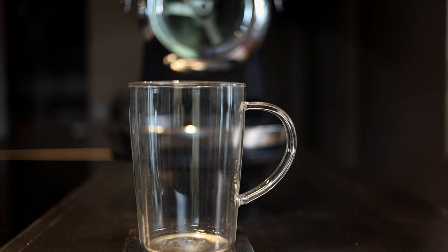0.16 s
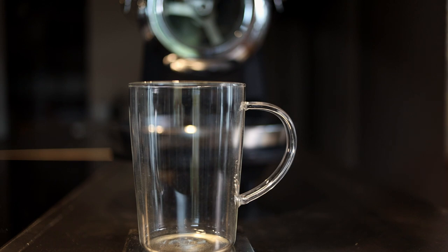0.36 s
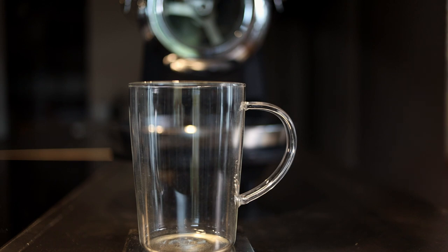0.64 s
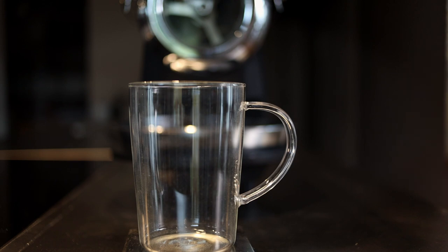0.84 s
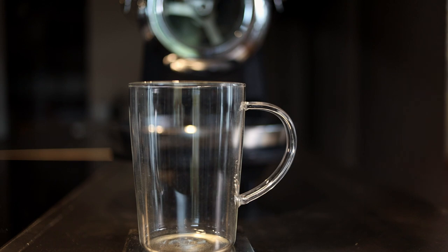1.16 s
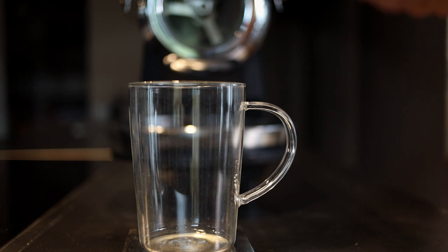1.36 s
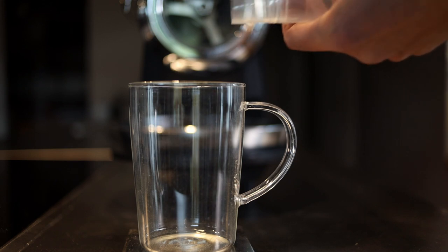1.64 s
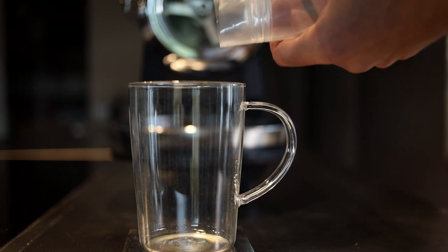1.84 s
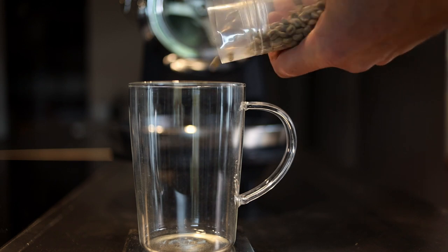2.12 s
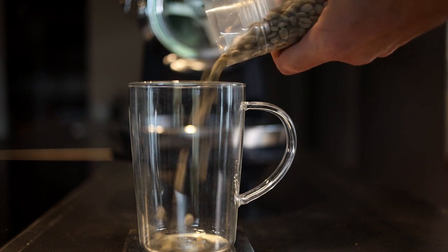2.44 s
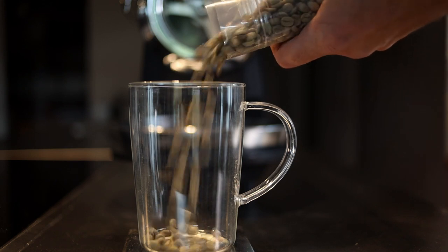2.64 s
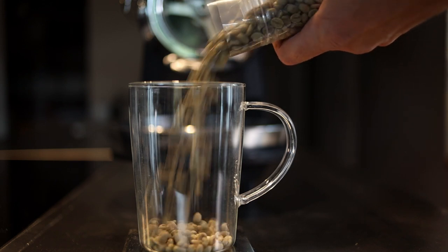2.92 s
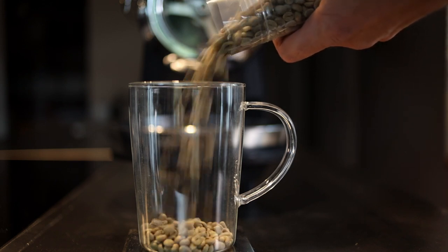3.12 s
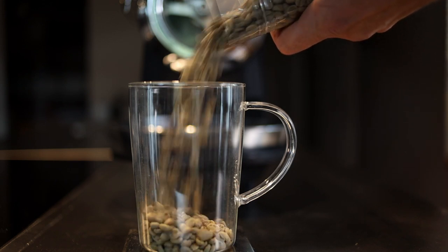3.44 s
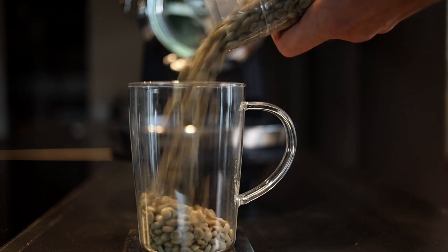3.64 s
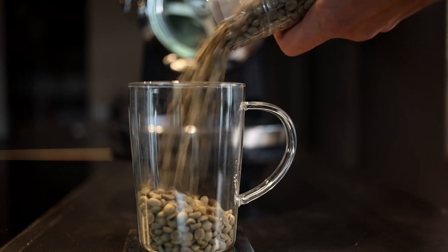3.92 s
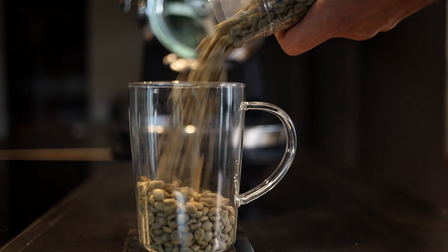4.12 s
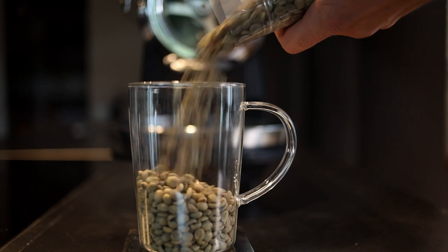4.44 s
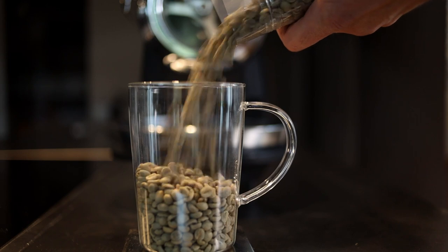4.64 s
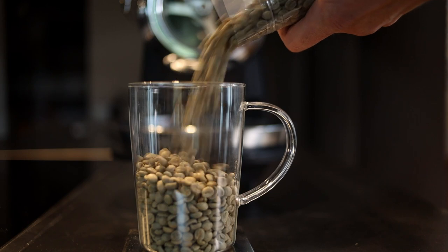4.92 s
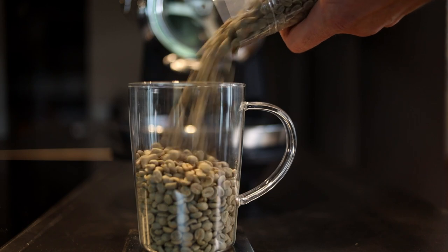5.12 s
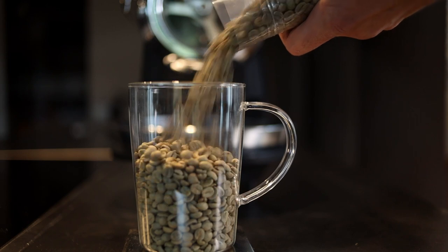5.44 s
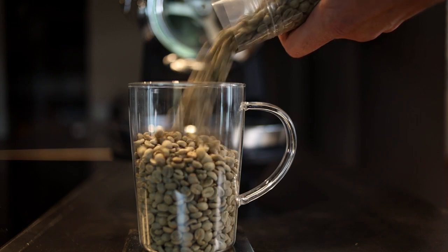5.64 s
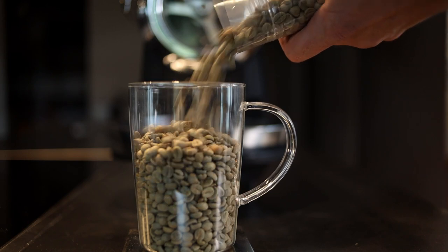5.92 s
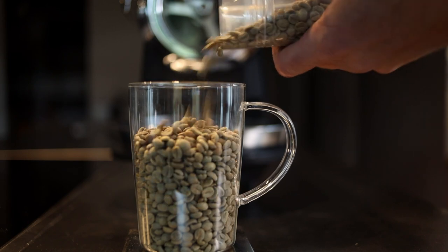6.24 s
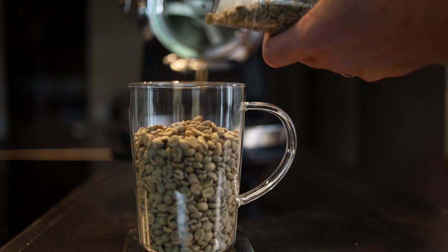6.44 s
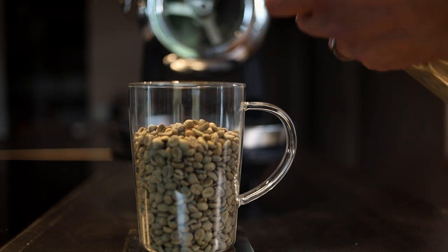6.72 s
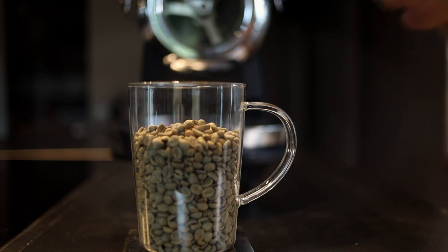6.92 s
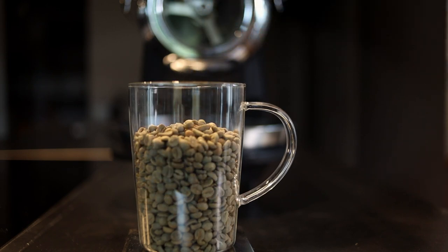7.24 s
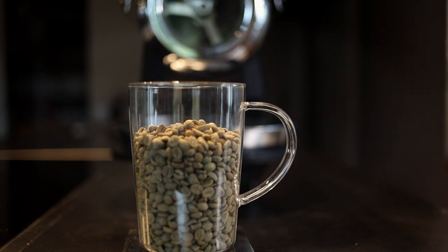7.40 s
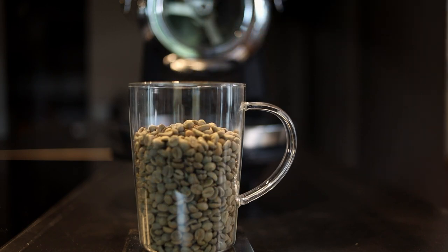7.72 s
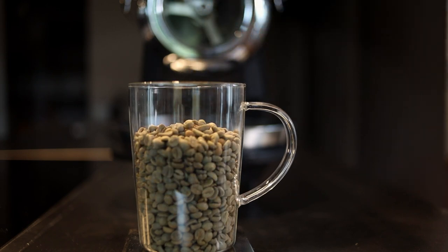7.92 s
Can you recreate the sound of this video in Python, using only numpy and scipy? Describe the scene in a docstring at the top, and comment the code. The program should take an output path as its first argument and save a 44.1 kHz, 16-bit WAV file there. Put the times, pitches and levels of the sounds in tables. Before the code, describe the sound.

Thin plastic pops and clicks while hard beans jostle within it, with soft low handling bumps. A stream of beans strikes an empty glass mug sharply, ringing and sizzling, then quickly drops to a softer, steady patter with faint rim tinkles. After the last few beans, the remaining ones tumble back in the cup, rattling brightly with hollow knocks. Close microphone, small room with short reverberation, faint steady room tone.

```python
"""Hard beans slide and rattle in a thin plastic cup that creaks and snaps in a hand, then pour into a glass mug.
The first beans ring the bare bottom; later ones ring the wall and patter on the heap, until only the rim rings.
The stream thins to single beans, the cup is tipped back and its beans slide down again with a brighter hiss.
Noise bursts make the rattle, hiss and patter, damped sines the knocks and snaps, resonant modes the glass.
A small room answers the hand and the mug over a steady room tone."""
import sys
import numpy as np
from scipy import signal
from scipy.fft import rfft, irfft, next_fast_len
from scipy.io import wavfile
from scipy.ndimage import map_coordinates

SR = 44100
rng = np.random.default_rng(int(sys.argv[2]) if len(sys.argv) > 2 else 0)


def output_pcm(signal):
    """Save a mono or channel-first signal as 16-bit PCM at the path in sys.argv[1].

    Samples are clipped to [-1, 1] before scaling.
    """
    pcm = np.clip(np.atleast_2d(signal).T, -1, 1) * 32767
    wavfile.write(sys.argv[1], SR, np.round(pcm).astype(np.int16))


N = 355887
TIME = np.arange(N) / SR  # s

# the stream of beans onto the glass: [t/s, clatter level/dB]
POUR = [(2.34, -45), (2.46, -32.5), (2.55, -25), (2.72, -24), (2.9, -21), (3.13, -24), (3.24, -35.5),
        (3.32, -35), (3.58, -40), (3.66, -40), (3.82, -41), (3.9, -44.5), (4.25, -39.5), (4.45, -46),
        (5.4, -49), (6.1, -55), (6.39, -53), (6.62, -63.5)]


def cup():
    """Sliding beans: dull noise bursts and hollow knocks on the plastic, and a finer hiss of bean on bean."""
    # spectrum of the dull rattle: [f/Hz, level/dB]
    rattle_spectrum = [(30, -32), (210, -14), (247, -9), (357, -3.5), (621, 2.5), (1250, 1.5), (4000, -24),
                       (5200, -50), (8800, -120)]
    # spectrum of the bean-on-bean hiss: [f/Hz, level/dB]
    hiss_spectrum = [(1290, -10), (2200, 1), (6120, -13), (8030, -16.5), (15800, -31)]
    # hiss of the beans running back down the emptied cup: [f/Hz, level/dB]
    tumble_spectrum = [(1180, -28), (2000, -2), (3540, -5.5), (6160, -8.5), (7070, -11), (7980, -22),
                       (9650, -21.5), (15800, -37.5)]
    # span with the cup tipped back: [from t/s, to t/s]
    tipped_back = (6.5, 7.45)
    # a tilt lets the beans slide: [start t/s, rise/s, hold/s, rattle level/dB, fall/(dB/s), hiss re rattle/dB]
    slides = [(0.545, 0.0063, 0.031, -25.5, 71, -11.5), (1.03, 0.072, 0.074, -39, 100, -6),
              (1.16, 0.11, 0.0034, -28.5, 83, -9), (1.45, 0.38, 0.17, -47, 60, -12),
              (1.75, 0.31, .005, -43, 32, -5), (2.06, 0.12, .02, -43, 100, -27),
              (6.605, 0.036, 0.0053, -48.5, 56, -4.5), (6.64, 0.1, 0.063, -35.5, 22, -6.5),
              (6.75, 0.21, 0.27, -28.5, 82, -13), (7.53, 0.11, .005, -42, 79, 0),
              (7.8, 0.28, 0.17, -62, 30, -26)]
    # a jerk of the cup shakes the beans: [start t/s, rattle level/dB, fall/(dB/s), hiss re rattle/dB]
    jolts = [(-0.015, -33, 94, -2), (0.188, -37, 167, -32), (0.275, -39, 121, -3.5), (0.469, -37.5, 60, -9),
             (0.837, -34, 205, -38), (0.9, -43, 32.5, -7), (0.991, -26.5, 198, -5.5),
             (1.451, -35.5, 236, -17), (2.199, -34, 138, -8), (7.515, -33, 201, -26),
             (7.603, -35, 87.5, -7), (7.698, -29, 114.5, -3.5)]
    jolt_rise_s = 0.0095
    hiss_fall = 1.14  # the hiss dies this many times faster than the rattle

    rumble = unit(coloured(contacts(700, spread_db=3.0, life=0.004), rattle_spectrum))
    hollow = unit(knocks(count=1800, pitch_hz=998, cycles=10.8, spread_db=0.0, size=3))
    rattle = unit((rumble + 0.69 * hollow) * clumps(0.3, 25))

    grit = contacts(7900, spread_db=2.0, life=0.0007)
    is_back = np.abs(TIME - np.mean(tipped_back)) < np.ptp(tipped_back) / 2
    hiss = np.where(is_back, unit(coloured(grit, tumble_spectrum)), unit(coloured(grit, hiss_spectrum)))

    # overlapping movements add as power
    rattle_power, hiss_power = np.zeros(N), np.zeros(N)
    moves = [*slides, *((s, jolt_rise_s, 0, db, fall, hiss_db) for s, db, fall, hiss_db in jolts)]
    for start, rise, hold, db, fall, hiss_db in moves:
        rattle_power += amp(2 * db) * swell(start, rise, hold, fall)
        hiss_power += amp(2 * (db + hiss_db)) * swell(start, rise, hold, hiss_fall * fall)
    return np.sqrt(rattle_power) * rattle + np.sqrt(hiss_power) * hiss


def clunks():
    """Lumps of beans hit the cup wall: each is a sine that dies within a few cycles."""
    # the lumps: [t/s, level/dB, f/Hz]
    lumps = [(.712, -26.5, 420), (6.914, -21, 550), (6.984, -13, 710), (7.125, -20, 546), (7.198, -19, 770),
             (7.246, -25, 694)]
    return blips(lumps, cycles=3.3)


def snaps():
    """A snap is a few cycles of the bent panel, a dull burst and a very short crack; the thin cup radiates no bass."""
    # the cup wall buckles or knocks: [t/s, panel level/dB, panel f/Hz, crack re panel/dB]
    buckles = [(0.0808, -10.5, 1930, -50), (0.1995, -17, 790, -52), (0.2008, -10.5, 2350, -50),
               (0.2794, -9.5, 2300, -38), (0.3032, -17.5, 920, -35), (0.487, -19, 1260, -23),
               (0.526, -7, 1440, -18), (0.5575, -16.5, 363, -4.5), (0.5816, -12, 1270, -7),
               (0.5987, -6, 705, -17), (0.64, -18, 660, -35), (0.753, -22.5, 447, -30),
               (0.8388, -19.5, 710, -39), (0.8777, -19, 526, -14.5), (1.001, -26.5, 920, -5),
               (1.1623, -11.5, 1950, -15), (1.2167, -17, 515, -21), (1.249, -11, 625, -7.5),
               (1.286, -12, 1080, -21), (1.4373, -18.5, 935, -47), (1.4667, -19.5, 610, -33.5),
               (1.777, -25.5, 1170, -18), (2.0338, -17.5, 1660, -15), (2.2143, -12.5, 1900, -23),
               (2.432, -14.5, 682, -4.5), (6.651, -7, 1380, -31), (7.2958, -11, 728, -35),
               (7.5239, -22, 533, -33), (7.5397, -15.5, 686, -23.5), (7.6082, -3, 1170, -20),
               (7.7095, -9, 1780, -17), (7.7123, -8.5, 1815, -9.5), (7.9778, -38, 492, -30.5),
               (8.0146, -38.5, 1008, -46)]
    out, t = np.zeros(N + SR), np.arange(SR // 25) / SR
    burst_decay = amp(-60 * t / 0.011)  # 60 dB down in 11 ms
    for s, db, hz, crack_db in buckles:
        attack = 1 - np.exp(-t / 0.000065)
        panel = np.sin(2 * np.pi * hz * t) * np.exp(-hz * t / 1.35) * attack
        # the wider smoothing window makes the duller burst
        thud = np.convolve(rng.standard_normal(len(t)), np.hanning(14) / 3)[:len(t)] * burst_decay
        crack = np.convolve(rng.standard_normal(len(t)), np.hanning(5) / 2)[:len(t)] * burst_decay
        out[round(s * SR):][:len(t)] += amp(db) * (panel + 0.4 * thud + amp(crack_db) * crack)
    thin_cup = signal.butter(2, [330, 9000], "band", fs=SR, output="sos")
    return signal.sosfilt(thin_cup, out[:N])


def thumps():
    """Low bumps of hand and cup: heavily damped sines of about one cycle."""
    # the bumps: [t/s, level/dB, f/Hz]
    bumps = [(0.905, -32, 150), (1.605, -45, 69.6), (1.775, -41, 174), (1.985, -37, 163), (2.21, -23, 174),
             (7.3, -25, 117), (7.708, -21.5, 150)]
    return blips(bumps, cycles=0.91)


def mug():
    """The stream rings the bottom while it is bare, then the wall, then only the rim; the heap patters."""
    # the heap hides the bottom: [from t/s, to t/s]
    covered = (3.22, 3.3)
    # the heap climbs the wall: [from t/s, to t/s]
    filled = (3.8, 4.55)
    # the stream dwindles to single beans: [from t/s, to t/s]
    thinning = (6.1, 6.35)
    # each falls from 1 to 0 over its span
    bare, low, dense = (np.interp(TIME, span, [1, 0]) for span in (covered, filled, thinning))
    stream, sides = pouring_beans(low, dense)
    return glass(stream, sides, bare, low, dense) + amp(-8 * bare) * clicks(stream, dense) + heap()


def pouring_beans(low, dense):
    """Impulses of random size for beans on the glass, and those of them that glance off its sides."""
    # single clear beans on the glass: [t/s, blow level/dB]
    strikes = [(2.335, 5), (2.4156, 5), (2.4407, 4.5), (2.4564, -2), (2.4701, 7), (2.4764, 2),
               (2.5004, 7.5), (2.5159, 1.5), (2.5251, 6), (2.549, 6), (2.5875, 6), (2.6004, 6),
               (2.616, 8.5), (2.6497, 6.5), (2.6668, 6.5), (2.7165, 4), (2.742, 5), (2.7518, 6.5),
               (2.836, 7.5), (2.8917, 5), (2.9366, 0.5), (3.4227, 1), (3.6501, 1.5), (6.0646, -20),
               (6.109, -12), (6.2841, -14), (6.4607, -22), (6.543, -28)]
    glance_db = -11.5  # share of a clear blow that the sides take
    rate = 150 + 200 * dense  # beans a second
    sizes = amp(0.8 * np.minimum(rng.exponential(size=N), 3.5))
    stream = sizes * (rng.random(N) < rate / SR) * clumps(0.47, 18) / np.sqrt(rate)
    stream *= amp(curve(POUR)) / np.sqrt(np.mean(stream ** 2))
    sides = stream * (rng.random(N) < .4 + .3 * low)
    for s, db in strikes:
        stream[round(s * SR)] = amp(db)
        sides[round(s * SR)] = amp(db + glance_db)
    return stream, sides


def glass(stream, sides, bare, low, dense):
    """Blows excite the modes of base, free wall and rim in turn; nothing of the ring sounds below about 400 Hz."""
    # air column and thick base: [f/Hz, width/Hz, level/dB]
    bottom_modes = [(643, 90, -20.5), (1796, 150, -14.5), (3270, 700, -2), (6290, 1110, 0),
                    (8000, 1400, -11), (9650, 920, -4.5), (10800, 1700, -9.5), (14340, 2700, -4.5)]
    # free wall: [f/Hz, width/Hz, level/dB]
    wall_modes = [(3500, 45, -10), (3910, 28, 0), (4260, 34, -1), (5020, 120, -10), (5460, 28, -2),
                  (6210, 35, -11), (6460, 45, -6), (7470, 62, 0), (7960, 47, -2), (8310, 40, -9),
                  (8590, 54, -10), (12600, 62, -9), (14300, 90, -11)]
    # what still rings above the heap: [f/Hz, width/Hz, level/dB]
    rim_modes = [(4690, 41, -4), (5490, 60, -3), (6610, 120, -0.5), (7860, 124, 0.5), (8570, 86, 0),
                 (10700, 80, -16), (11680, 200, 0.5)]
    bottom_db, wall_db, rim_db = 5.5, 22.5, 8.5  # gains of the three rings
    wall_bare_db = -14  # the wall is seldom hit while beans reach the bottom

    # on bare glass a bean hops and lands again
    bounced = stream.copy()
    at = np.flatnonzero(stream[:-SR // 10])
    hop = (SR * rng.uniform(.0012, .0045, len(at))).astype(int)
    bounced[at + hop] += 0.65 * stream[at]

    bottom = ringing(bounced * bare, bottom_modes, scatter_db=3.0, order=2, wander=.012, climb=0)
    wall_blows = sides * amp(wall_bare_db * bare) * low
    wall = ringing(wall_blows, wall_modes, scatter_db=4.0, order=1, wander=.0012, climb=0)
    rim = ringing(sides * (1 - low), rim_modes, scatter_db=5.0, order=1, wander=0.0054, climb=.012)
    rim *= amp(-4 * (1 - dense))  # the last beans drop softly
    ring = amp(bottom_db) * bottom + amp(wall_db) * wall + amp(rim_db) * rim
    return signal.sosfilt(signal.butter(2, 400, "high", fs=SR, output="sos"), ring)


def clicks(stream, dense):
    """Every bean of the stream ticks in a short bright burst; many finer contacts of bean on bean sizzle."""
    # spectrum of a hard contact: [f/Hz, level/dB]
    tick_spectrum = [(1180, -35.5), (2000, -19), (3960, -3), (10800, -3), (15800, -6)]
    ticks = amp(-9.0) * coloured(bursts(stream, life=0.0035), tick_spectrum)
    fine = unit(coloured(contacts(4000, spread_db=2.0, life=.0005), tick_spectrum))
    return ticks + dense * amp(curve(POUR) - 3.0) * fine


def heap():
    """Beans patter on beans: dull bursts and hollow knocks, bunched at two speeds."""
    # the stream on the heap: [t/s, patter level/dB]
    patter_level = [(2.33, -51), (2.46, -44), (2.55, -52), (2.9, -55), (3.6, -46.5), (4.7, -47.5),
                    (5.4, -47.5), (5.5, -47), (5.7, -50), (5.85, -46.5), (6.1, -53.5), (6.39, -70),
                    (6.62, -72)]
    # spectrum of the dull bursts: [f/Hz, level/dB]
    patter_spectrum = [(30, -34.5), (173, -18), (424, -2), (851, -0.5), (1040, 1), (2170, -3.5),
                       (2870, -11), (4550, -44.5), (7700, -120)]
    dull = unit(coloured(contacts(900, spread_db=0.0, life=0.0024), patter_spectrum))
    hollow = unit(knocks(count=2000, pitch_hz=1397, cycles=25.0, spread_db=1.5, size=4))
    patter = unit((dull + 0.59 * hollow) * clumps(0.99, 22) * clumps(1.17, 6.5))
    return amp(curve(patter_level)) * patter


def settling():
    """Beans knock as the heap settles: soft sines that die within several cycles."""
    # the knocks: [t/s, level/dB, f/Hz]
    shifts = [(4.407, -37, 1025), (4.44, -34, 1060), (5.049, -34, 960), (5.249, -34, 1220),
              (5.501, -35, 1044), (5.588, -37, 1160), (5.759, -37, 1060), (5.779, -33, 1005),
              (5.883, -36, 743), (6.076, -38, 1170)]
    return blips(shifts, cycles=6.2)


def ping():
    """One bean sets a low wall tone singing: a lightly damped sine."""
    # the tone: [t/s, level/dB, f/Hz]
    tone = [(3.637, -24.5, 3890)]
    return blips(tone, cycles=70)


def room(x):
    """A decaying noise tail in which each frequency dies at its own speed."""
    # decay of the room: [f/Hz, t60/s]
    decay = [(200, .3), (2000, .26), (10000, .17)]
    hz, t, z = signal.stft(rng.standard_normal(SR // 2), SR, nperseg=256)
    t60 = along(decay, hz)[:, None]
    tail = signal.istft(z * amp(-60 * t / t60), SR, nperseg=256)[1]
    delayed = np.pad(x, (200, 0))  # samples
    return signal.fftconvolve(delayed, tail / np.linalg.norm(tail))[:N]


def room_tone():
    """Steady filtered noise, strongest at low frequencies."""
    # spectrum of the room tone: [f/Hz, level/dB]
    air_spectrum = [(15, -26.5), (25, -8), (587, 17.5), (11700, -12), (15800, -5)]
    return amp(-65.5) * unit(coloured(rng.standard_normal(N), air_spectrum))  # rms dB


def ringing(blows, modes, scatter_db, order, wander, climb):
    """Damped modes, struck anew by each blow; leaning beans detune and mute them, the rising heap lifts the pitch."""
    lean_rate, mute_db = 7, 1.55  # changes a second of the load on the glass, its hold on a mode
    at = np.flatnonzero(blows[:-SR // 10])
    first, size = at[0], at[-1] - at[0] + SR // 10
    out, t = np.zeros(N), np.arange(size) / SR

    def slow():
        """A smooth random load."""
        return np.interp(t * lean_rate, np.arange(60), rng.standard_normal(60))

    for hz, width, db in modes:
        # each blow lands on another spot: new strength, sign and instant for every mode
        force = np.zeros(size)
        lag = (.0009 * SR * rng.random(len(at))).astype(int)
        strength = amp(scatter_db * rng.standard_normal(len(at))) * rng.choice([-1, 1], len(at))
        force[at - first + lag] = blows[at] * strength
        pitch = hz * (1 + wander * slow() + climb * (t - t.mean()))
        turn = np.exp(2j * np.pi * np.cumsum(pitch) / SR)
        # shift the blows down to 0 Hz, let them decay there and shift the swing back up
        swing = force * amp(mute_db * slow()) / turn
        keep = np.exp(-np.pi * width / SR)
        for _ in range(order):
            swing = signal.lfilter([1 - keep], [1, -keep], swing)
        out[first:first + size] += 2 * amp(db) * (swing * turn).real
    return out


def contacts(rate, spread_db, life):
    """Random contacts of uneven size, rate a second, each a burst of noise."""
    sizes = amp(spread_db * np.minimum(rng.exponential(size=N), 4))
    return bursts(sizes * (rng.random(N) < rate / SR), life)


def bursts(blows, life):
    """Every blow drawn out into a noise burst of the same energy with a time constant of life seconds."""
    keep = np.exp(-1 / (life * SR))
    return np.sqrt(1 - keep ** 2) * signal.lfilter([1], [1, -keep], blows) * rng.standard_normal(N)


def knocks(count, pitch_hz, cycles, spread_db, size):
    """Small hollow knocks of a few cycles; beans that slip together knock in a bunch at nearly one pitch."""
    bunch_s, length = .04, 600  # length of a bunch, samples of a knock
    start = np.repeat(rng.random(count // size), size)
    tone = np.repeat(rng.standard_normal(count // size), size)
    late, force, off = rng.random((len(start), 3)).T
    at = np.minimum(start * N + bunch_s * SR * late, N - 1).astype(int)
    hz, t = (pitch_hz * np.exp(.5 * tone + .3 * (off - .5)))[:, None], np.arange(length) / SR
    strength = amp(-spread_db * np.log(force + 0.14))[:, None]
    grains = strength * np.sin(2 * np.pi * hz * t) * np.exp(-hz * t / cycles)
    places = at[:, None] + np.arange(length)
    return np.bincount(places.ravel(), grains.ravel(), N + length)[:N]


def blips(rows, cycles):
    """Soft single knocks: sines with a rounded start and a time constant of so many cycles."""
    out, t = np.zeros(N + SR), np.arange(SR // 10) / SR
    for s, db, hz in rows:
        envelope = np.exp(-hz * t / cycles) * (1 - np.exp(-hz * t))
        out[round(s * SR):][:len(t)] += amp(db) * np.sin(2 * np.pi * hz * t) * envelope
    return out[:N]


def clumps(depth_db, rate):
    """Beans come in bunches: a smooth random gain, rate knots a second."""
    knots = rng.standard_normal(int(N * rate / SR) + 4)
    return amp(depth_db * map_coordinates(knots, [TIME * rate]))


def swell(start, rise, hold, fall):
    """Power that grows, holds and then falls by so many dB a second."""
    t = TIME - start
    return np.clip(t / rise, 0, 1) ** 2 * amp(-2 * fall * np.maximum(t - rise - hold, 0))


def coloured(x, spectrum):
    """x through a causal minimum-phase filter of the given spectrum."""
    m = 2 * next_fast_len(N // 2 + 4096)
    gain = amp(along(spectrum, np.fft.rfftfreq(m, 1 / SR)))
    # folding the cepstrum onto positive time makes the filter causal
    cepstrum = irfft(np.log(gain + 1e-6), m)
    cepstrum[1:m // 2] *= 2
    cepstrum[m // 2 + 1:] = 0
    return irfft(rfft(x, m) * np.exp(rfft(cepstrum)), m)[:N]


def curve(rows):
    """Level in dB per sample from rows of time and level; -120 dB outside the table."""
    s, db = np.transpose(rows)
    return np.interp(TIME, s, db, left=-120, right=-120)


def along(points, hz):
    """Values at hz between (Hz, value) points on a log frequency axis."""
    f, v = np.transpose(points)
    return np.interp(np.log(hz + 1), np.log(f + 1), v)


def amp(db):
    """Gain of a level in dB."""
    return 10 ** (np.asarray(db) / 20)


def unit(x):
    """Scaled to rms 1."""
    return x / np.sqrt(np.mean(x ** 2) + 1e-20)


def scene():
    """Cup, hand and mug, the room's answer to hand and mug, and the room tone."""
    hand = snaps() + thumps()
    pour = mug() + settling() + ping()
    echo = room(amp(-10) * hand + amp(-9) * pour)
    return (cup() + clunks() + hand + pour + echo + room_tone())[None]


def record(dry):
    """Nothing is kept above the band limit."""
    top_hz = 15780
    m = next_fast_len(N)
    kept = np.fft.rfftfreq(m, 1 / SR) < top_hz
    return irfft(rfft(dry, m) * kept, m)[:, :N]


dry = scene()
out = record(dry)
output_pcm(out)
```